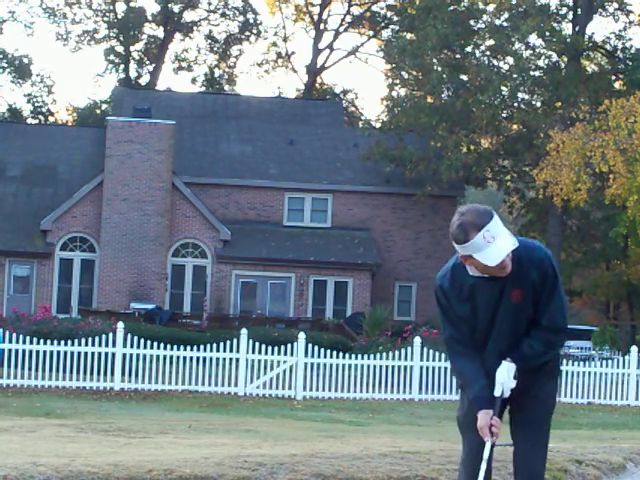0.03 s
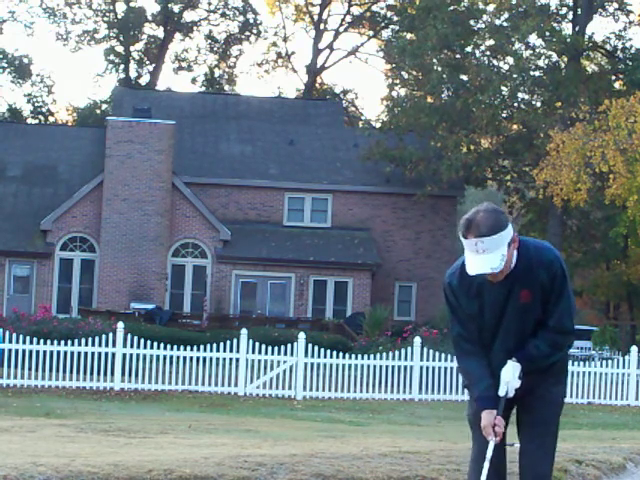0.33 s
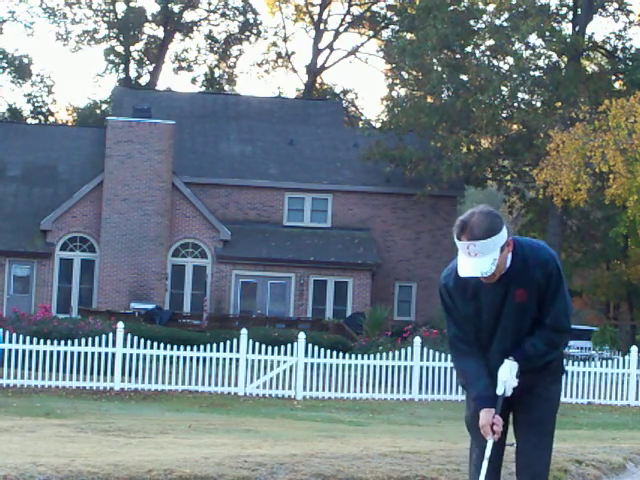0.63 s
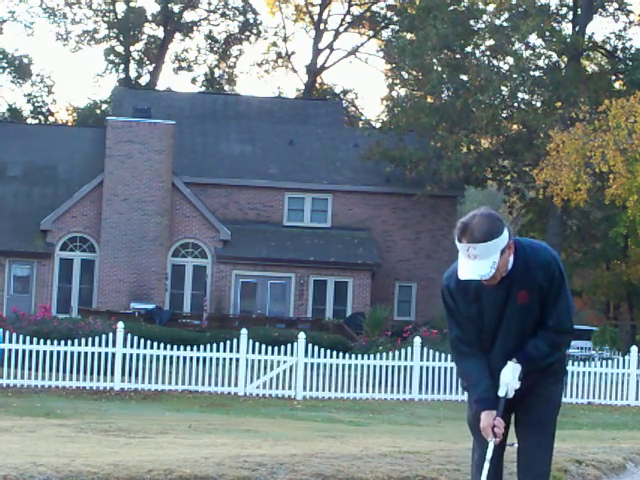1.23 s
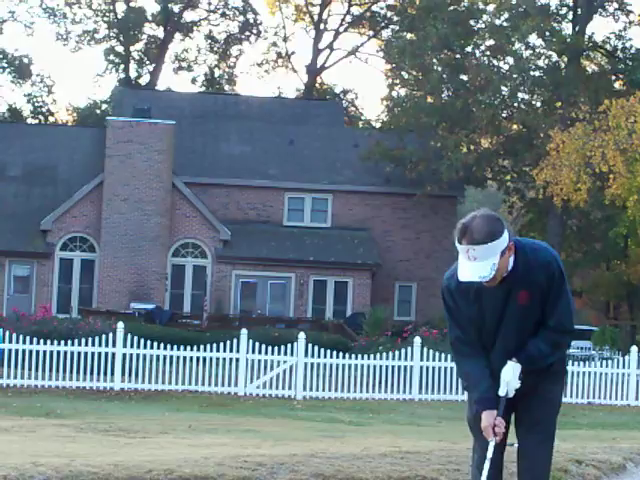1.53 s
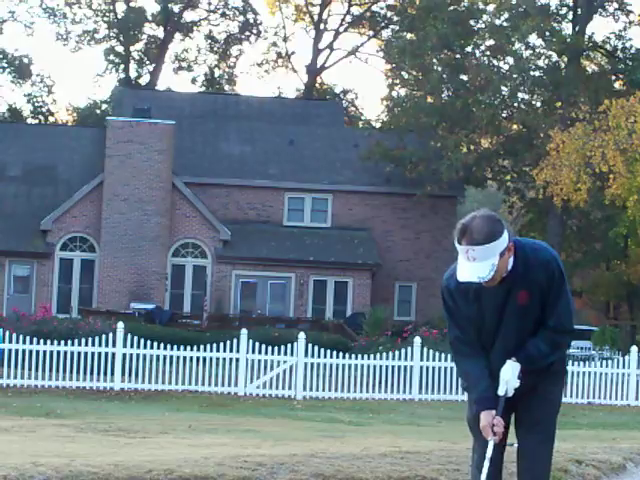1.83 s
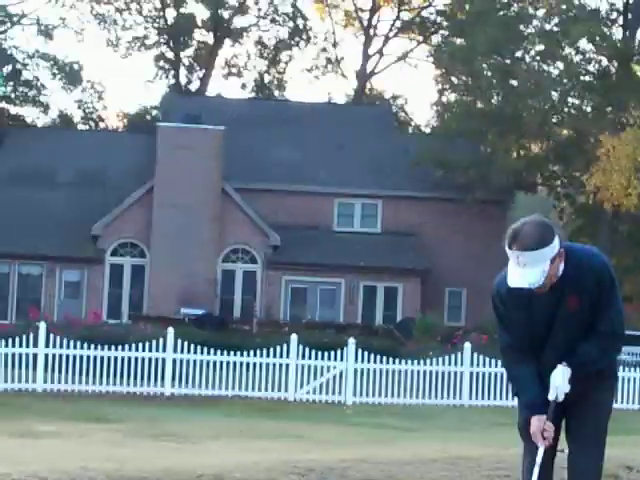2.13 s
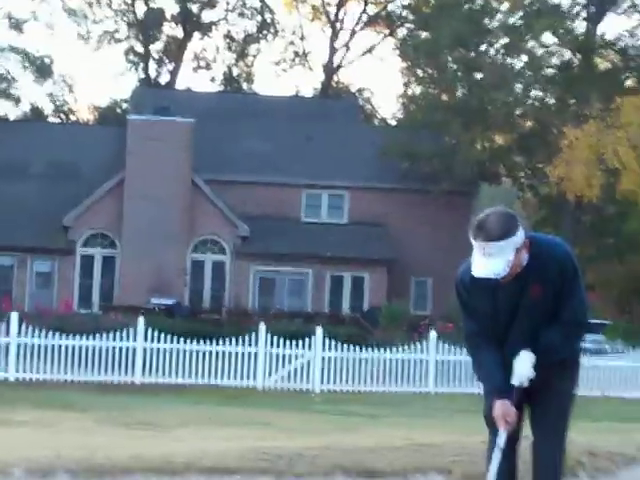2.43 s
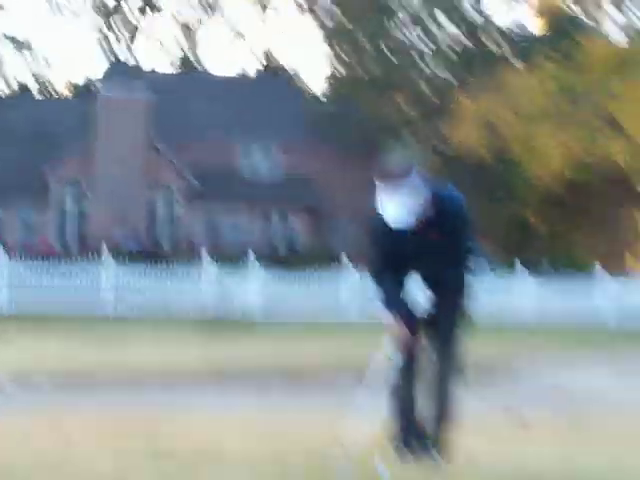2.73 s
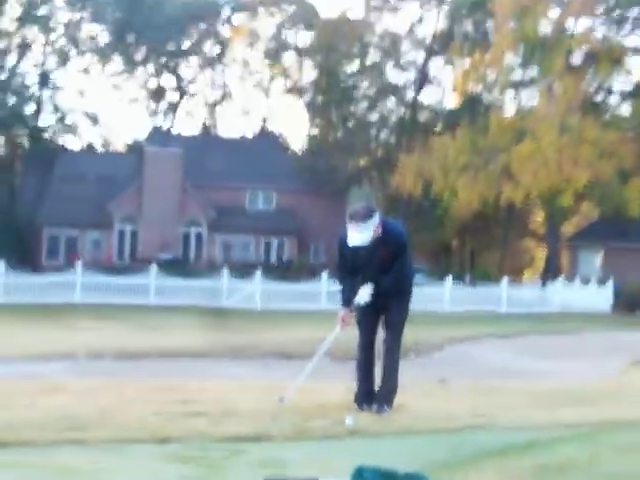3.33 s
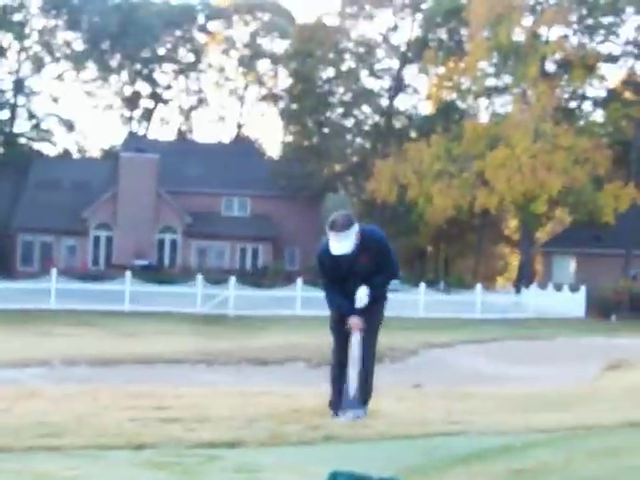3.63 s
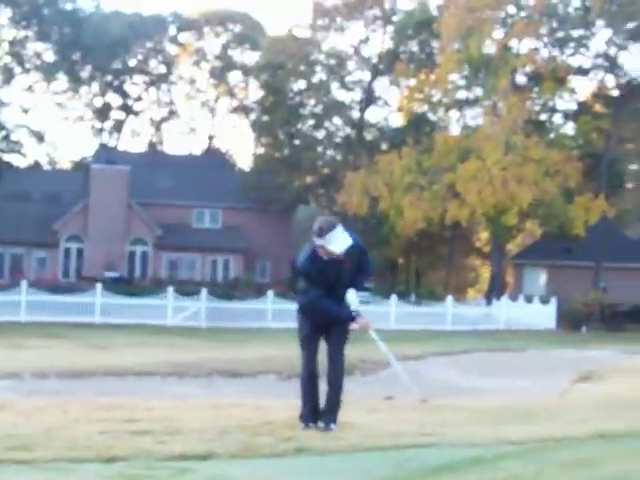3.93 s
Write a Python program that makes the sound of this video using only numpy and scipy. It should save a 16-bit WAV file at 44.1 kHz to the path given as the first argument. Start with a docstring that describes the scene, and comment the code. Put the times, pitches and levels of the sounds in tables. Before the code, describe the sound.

Handling noise on a camera: fingers knock on the plastic case, the zoom motor whirrs faintly, and its lever snaps back with one sharp, close click. Some metres away a golf club chips a ball, over distant traffic and trees.

```python
"""Camera noises on a quiet golf course

Fingers knock on a handheld camera's plastic case, the zoom motor runs for a second and its lever snaps
back with one sharp, loud click, which makes the camera turn its sound down. Some metres away a golf club
then chips the ball and brushes through the grass, over a distant rush of traffic and trees."""
import sys
import numpy as np
from scipy import signal
from scipy.fft import rfft, irfft
from scipy.io import wavfile
from scipy.ndimage import uniform_filter1d

SR = 44100
rng = np.random.default_rng(int(sys.argv[2]) if len(sys.argv) > 2 else 0)


def put_to_file(sound):
    """Save the sound as 16-bit audio at rate SR, in the file named by the first command-line argument."""
    columns = np.atleast_2d(sound).T  # one column per channel
    safe = np.clip(columns, -1, 1)
    whole_steps = np.round(safe * 32767)
    wavfile.write(sys.argv[1], SR, whole_steps.astype(np.int16))


N = 176400

# The tones of the plastic case. Each row: pitch in Hz, seconds to fade by 60 dB, relative level in dB.
CASE_TONES = [(299, 0.015, 1.5), (649, 0.019, -4), (880, 0.012, -3), (1223, 0.0091, -4), (1650, 0.01, -3),
              (2204, 0.0078, -3), (2760, 0.01, -5.5), (3140, 0.0093, -6.5), (3780, 0.0078, -11.5),
              (4570, 0.0077, -11.5), (5330, 0.0081, -14), (6150, 0.0083, -18), (6980, 0.0038, -12.5)]


def zoom_lever():
    """The lever slips, then rattles against its stop; so small a part gives no bass."""
    # Each row: start in seconds, level in dB, scrape length in seconds.
    hits = [(3.291, -40, .002), (3.296, -32.5, 0.00025), (3.2984, -20, .001), (3.309, -22.5, 0.00052),
            (3.3104, -12, 0.0022), (3.3128, -5, 0.0011), (3.3161, -18, 0.00096)]
    # Each row: pitch in Hz, seconds to fade by 60 dB, relative level in dB.
    lever_tones = [(385, 0.02, -8), (649, 0.017, -3.5), (1028, 0.02, -8.5), (1507, .014, -3.5),
                   (1830, .012, -2), (2190, 0.015, -5.5), (2680, 0.015, -7.5), (3230, 0.013, -11.5),
                   (3710, .006, -10), (4320, .007, -10), (4600, 0.011, -11), (5160, .006, -10.5),
                   (6100, 0.0069, -19), (6850, .009, -17)]
    out = np.zeros(N)
    for start, db, scrape_s in hits:
        add(out, start, at_level(strike(lever_tones, scrape_s, grit=0.14), db))
    return low_cut(out, hz=232)


def finger_knocks():
    """Soft finger pads knock dully and thud on the case; hard edges tick."""
    # Each row: start in seconds, level in dB, centre pitch in Hz, scrape length in seconds, thud in dB.
    knocks = [(0.3714, -28.5, 930, 0.0053, -44), (0.379, -27, 342, 0.00067, -23),
              (0.385, -39, 1900, .002, -41), (1.9118, -30, 1170, 0.0016, -41),
              (1.9172, -31.5, 804, 0.0028, -66), (1.9245, -25, 685, 0.0021, -27.5),
              (1.9247, -21.5, 2580, 0.001, -62), (2.001, -41, 504, .002, -54),
              (2.0063, -38, 550, 0.0027, -30), (2.047, -43.5, 900, 0.0015, -59),
              (2.153, -34, 6230, 0.0002, -62), (2.215, -44, 3600, 0.00057, -69),
              (2.222, -21.5, 860, 0.0029, -51), (2.2226, -26, 5300, 0.0014, -60),
              (2.257, -29.5, 474, 0.0062, -71), (2.2737, -49.5, 5940, 0.001, -73),
              (2.337, -44.5, 3600, 0.0042, -59), (2.375, -39, 3230, 0.00103, -65),
              (2.3801, -30.5, 540, 0.0033, -62), (2.3852, -29, 1390, 0.0017, -40),
              (2.405, -42, 790, 0.0012, -37), (2.4146, -29.5, 2680, 0.00043, -67),
              (2.422, -23, 674, 0.0036, -29.5), (2.4818, -29, 840, 0.0021, -58),
              (3.728, -37.5, 800, .003, -32.5), (3.751, -33, 393, 0.00091, -44),
              (3.776, -26, 1380, 0.0033, -41), (3.822, -40, 2200, .002, -41), (3.828, -31, 410, .002, -28),
              (3.868, -40, 2400, 0.0012, -46)]
    thud = low_cut(ring([(162.4, 0.018, 0)]), hz=91)  # one low tone that dies fast
    out = np.zeros(N)
    for start, db, hz, scrape_s, thud_db in knocks:
        knock = steep_band(strike(CASE_TONES, scrape_s, grit=0.2), hz, width=hz / 0.72)
        add(out, start, at_level(knock, db))
        add(out, start, undb(thud_db) * thud)
    return out


def finger_rubs():
    """Skin slides lightly over the case."""
    # Each row: middle in seconds, half length in seconds, level in dB.
    rubs = [(0.299, 0.0097, -59), (0.884, 0.013, -55), (0.941, 0.0087, -59), (1.882, 0.0094, -58)]
    out = np.zeros(N)
    for middle, half_s, db in rubs:
        rub = puff(half_s, hz=1600, width=1060)
        add(out, middle - len(rub) / 2 / SR, undb(db) * rub)
    return out


def finger_squeak(start=0.384, length_s=0.0095, from_hz=1300, to_hz=1790):
    """A fingertip squeaks on the plastic: a tiny rising tone with a faint octave above it."""
    progress = np.linspace(0, 1, int(length_s * SR))
    phase = 2 * np.pi * np.cumsum(from_hz + (to_hz - from_hz) * progress) / SR
    tone = np.sin(phase) + undb(-21) * np.sin(2 * phase)
    swell = 2 * np.sqrt(progress * (1 - progress))
    out = np.zeros(N)
    add(out, start, undb(-38) * swell * tone)
    return out


def zoom_motor():
    """The motor whirrs, and its gear teeth catch now and then with a tick."""
    # The bands of the whirr. Each row: centre in Hz, half width in Hz, relative level in dB.
    bands = [(764, 410, 11), (1286, 250, 6.5), (2356, 290, 5.5), (2820, 150, -3.5), (3550, 170, -2.5),
             (4570, 140, -36.5), (6100, 250, -14)]
    # Each row of both tables: time in seconds, level in dB.
    whirr_levels = [(2.3, -69), (2.35, -56.5), (2.55, -55.5), (2.72, -60.5), (2.87, -57.5), (3.0, -62),
                    (3.29, -58.5), (3.33, -85)]
    gear_ticks = [(2.509, -52), (2.5534, -61), (2.573, -40.5), (2.614, -42), (2.629, -56), (2.6546, -43.5),
                  (2.672, -45.5), (2.818, -49), (2.835, -47), (2.8594, -42), (2.872, -45), (2.8992, -45.5),
                  (2.9187, -47)]
    noise = rng.standard_normal(N)
    whirr = sum(undb(db) * steep_band(noise, hz, 2 * half_width) for hz, half_width, db in bands)
    out = unit(whirr) * fade(whirr_levels)
    for start, db in gear_ticks:
        tick = band(strike(CASE_TONES, scrape_s=0.001, grit=0.2), hz=2600, width=5200)
        add(out, start, at_level(tick, db))
    return out


def lens_focus():
    """The lens refocuses with a faint chatter."""
    # Each row: time in seconds, level in dB.
    levels = [(3.33, -76), (3.43, -67.5), (3.457, -60), (3.48, -67.5), (3.522, -57), (3.55, -84),
              (3.7, -65.5), (3.89, -71), (3.93, -79), (4, -91)]
    hiss = steep_band(rng.standard_normal(N), hz=2523, width=990)
    return unit(hiss * flutter(per_second=120, spread_db=4)) * fade(levels)


def chip_shot(hit_s=3.6328):
    """The club nips the turf, clicks on the ball and swishes on through the grass."""
    # The ball's click. Each row: pitch in Hz, seconds to fade by 60 dB, relative level in dB.
    ball_tones = [(1300, 0.015, 4.5), (2160, 0.015, -3.5), (3320, 0.0089, -5), (5000, .006, -23)]
    # Each row: time in seconds, level in dB.
    grass_levels = [(3.645, -79), (3.665, -56), (3.70, -59), (3.72, -65.5), (3.79, -74), (3.88, -70),
                    (3.93, -76)]
    swish = steep_band(rng.standard_normal(N), hz=2970, width=2500)
    out = unit(swish * flutter(per_second=130, spread_db=2.6)) * fade(grass_levels)
    nip = puff(half_s=0.0016, hz=4950, width=2700)
    add(out, hit_s - len(nip) / 2 / SR, undb(-53) * nip)
    add(out, hit_s, at_level(ring(ball_tones), db=-27.5))
    return out


def traffic_and_trees(split_hz=388):
    """Far-off traffic and trees make a low rumble and, above it, a rush that eases off early on."""
    # Each row: frequency in Hz, relative level in dB.
    spectrum = [(15, -31.5), (25, -37.5), (43, -4), (109, 2.5), (201, -4), (233, -3.5), (305, -9.5),
                (420, -8.5), (487, -9), (607, -8), (967, -12.5), (1790, -19.5), (3820, -34), (7410, -47.5),
                (8800, -50.5), (11400, -93.5), (19400, -120)]
    # Each row of both tables: time in seconds, level in dB.
    rumble_levels = [(0, -55), (.7, -56), (1.7, -56.5), (2.1, -54.5), (3.2, -55), (4, -57.5)]
    rush_levels = [(0, -52), (.25, -51), (.45, -55), (.9, -55), (1.7, -57), (2.3, -57), (3.3, -58),
                   (4, -55.5)]
    freqs = np.arange(N // 2 + 1) * SR / N + 1
    hz, db = np.array(spectrum).T
    colour = undb(np.interp(np.log(freqs), np.log(hz), db))
    low_share = 1 / (1 + (freqs / split_hz) ** 4)
    out = np.zeros(N)
    for share, levels in ((low_share, rumble_levels), (1 - low_share, rush_levels)):
        noise = irfft(rfft(rng.standard_normal(N)) * colour * np.sqrt(share), N)
        out += unit(noise) * fade(levels) * flutter(per_second=27, spread_db=1.16)
    return out


def ring(tones, size=3072):
    """A struck part rings with dying tones; neighbouring tones swing opposite ways."""
    t = np.arange(size) / SR
    return sum((-1) ** k * undb(db) * np.sin(2 * np.pi * hz * t) * np.exp(-np.log(1000) * t / fade_s)
               for k, (hz, fade_s, db) in enumerate(tones))


def strike(tones, scrape_s, grit, size=1536):
    """A clean blow and a dying scrape make a part ring; grit sets how strong the scrape is."""
    force = grit * rng.standard_normal(size) * np.exp(-np.arange(size) / SR / scrape_s)
    force[0] += 1  # the blow
    return signal.fftconvolve(force, ring(tones, size))[:size]


def puff(half_s, hz, width, size=4096):
    """A short swell of rubbing noise, loudest in its middle."""
    t = (np.arange(size) - size / 2) / SR
    return unit(steep_band(rng.standard_normal(size), hz, width)) * np.exp(-(t / half_s) ** 2)


def band(x, hz, width):
    """Keep the sound around hz, in a band whose width is given in Hz."""
    angle = 2 * np.pi * min(hz, SR / np.pi) / SR
    damping = np.sin(angle) * width / hz / 2
    return signal.lfilter([damping, 0, -damping], [1 + damping, -2 * np.cos(angle), 1 - damping], x)


def steep_band(x, hz, width):
    """Filter twice, for a band with steeper sides."""
    return band(band(x, hz, width), hz, width)


def low_cut(x, hz):
    """Weaken the bass below hz."""
    return signal.sosfilt(signal.butter(2, hz, "high", fs=SR, output="sos"), x)


def flutter(per_second, spread_db):
    """A volume that wanders smoothly at random."""
    hold = int(SR / per_second)
    steps = np.repeat(rng.standard_normal(N // hold + 1), hold)
    return undb(spread_db * unit(uniform_filter1d(steps, hold)[:N]))


def fade(points):
    """A volume that glides through (seconds, dB) points."""
    return undb(np.interp(np.arange(N) / SR, *np.array(points).T))


def at_level(x, db):
    """Give a click the energy of one millisecond of a pure tone that peaks at this level."""
    return x * undb(db) / np.sqrt(2000 * np.sum(x ** 2) / SR)


def undb(db):
    """Turn decibels into a volume factor."""
    return 10 ** (np.asarray(db) / 20)


def unit(x):
    """Scale a signal so its typical swing is 1."""
    return x / np.std(x)


def add(out, start, x):
    """Mix x into out, beginning at start seconds."""
    i = int(round(start * SR))
    out[i:i + len(x)] += x[:N - i]


def scene():
    """All the sounds meet at one microphone."""
    camera = zoom_lever() + finger_rubs() + finger_knocks() + finger_squeak()
    lens = zoom_motor() + lens_focus()
    return (camera + lens + chip_shot() + traffic_and_trees())[None]


def record(dry, limit_db=-25.5, react_s=0.016):
    """The camera turns down fast after a loud sound, comes back up slowly and dulls the treble."""
    x = low_cut(dry[0], hz=28)
    x = signal.lfilter(*signal.iirnotch(482.4, Q=5.1, fs=SR), x)  # cut one narrow band
    level_db = 10 * np.log10(np.abs(uniform_filter1d(x ** 2, size=220)) + 1e-12)
    sink_db = np.arange(N) / SR  # the remembered peak sinks by 1 dB a second
    peak_db = np.maximum.accumulate(level_db + sink_db) - sink_db
    target_cut_db = 0.53 * np.maximum(peak_db - limit_db, 0)
    step = 1 / (react_s * SR)
    cut_db = signal.lfilter([step], [1, step - 1], target_cut_db)  # ease towards the target
    x = x * undb(-cut_db)
    x = signal.sosfilt(signal.butter(8, 7500, fs=SR, output="sos"), x)
    return signal.sosfilt(signal.ellip(8, .2, 70, 8850, fs=SR, output="sos"), x)[None]


dry = scene()
out = record(dry)
put_to_file(out)
```